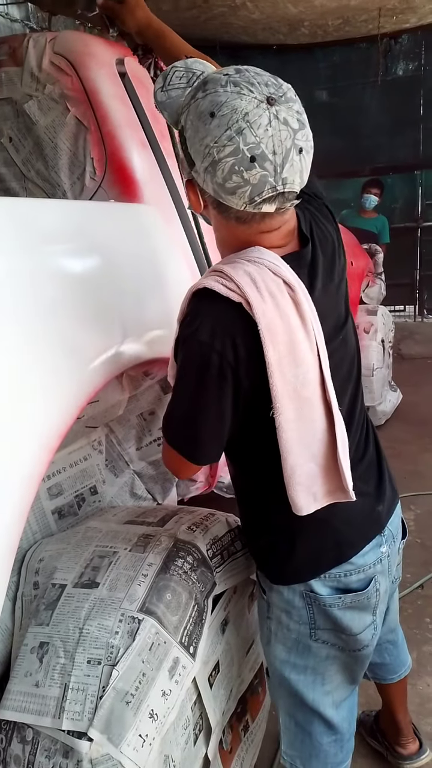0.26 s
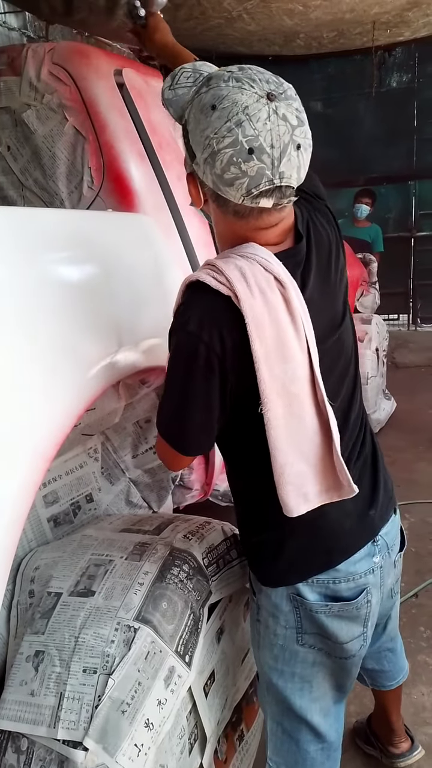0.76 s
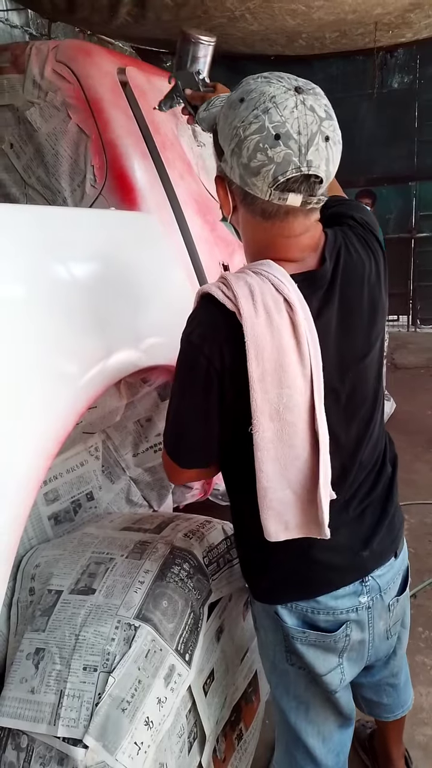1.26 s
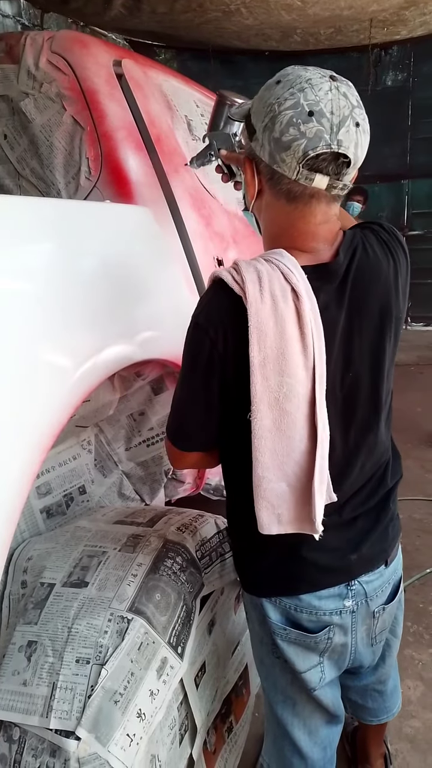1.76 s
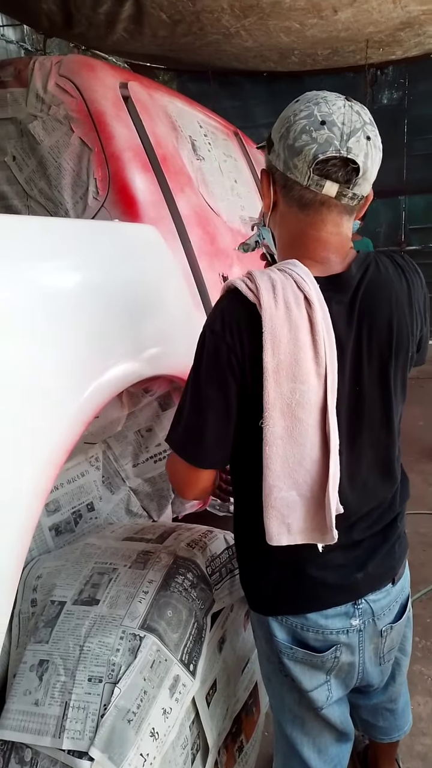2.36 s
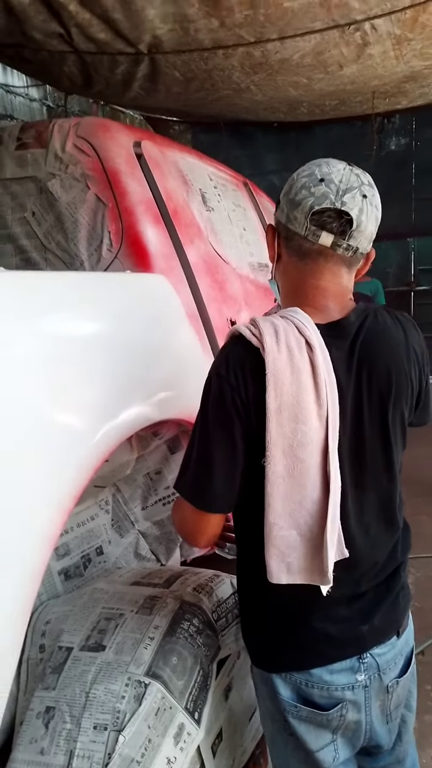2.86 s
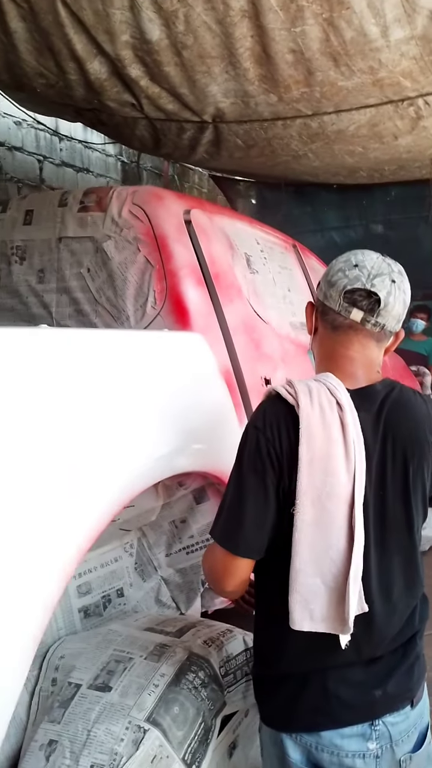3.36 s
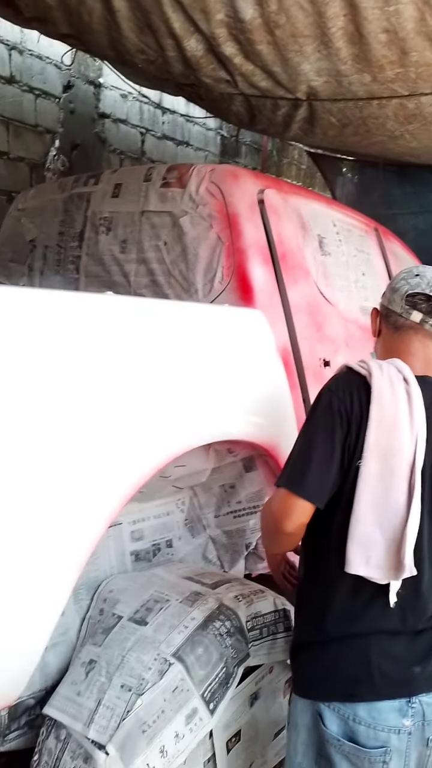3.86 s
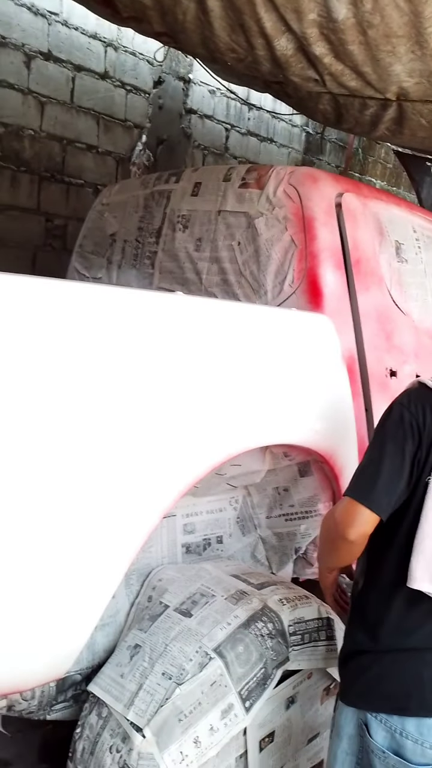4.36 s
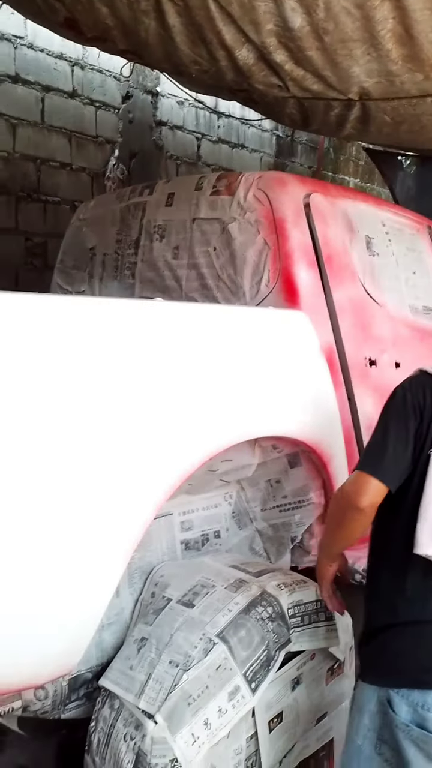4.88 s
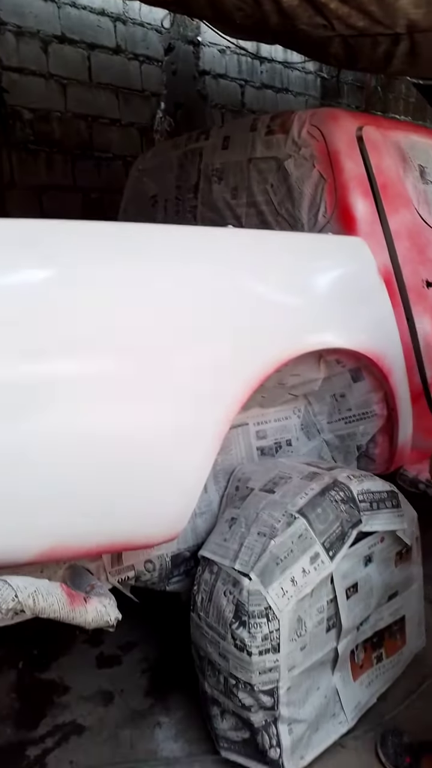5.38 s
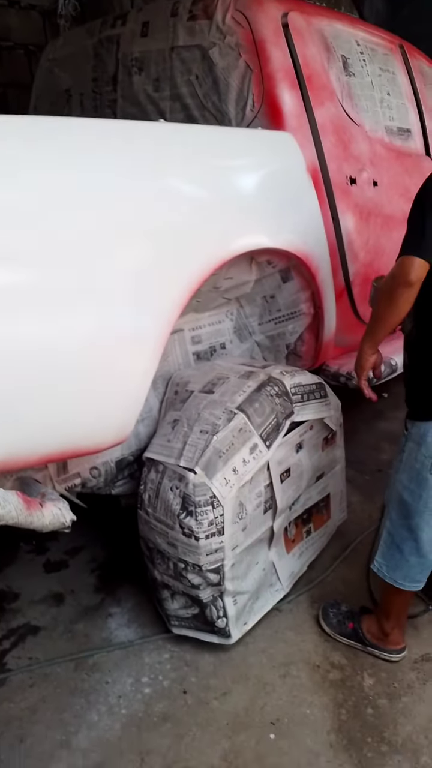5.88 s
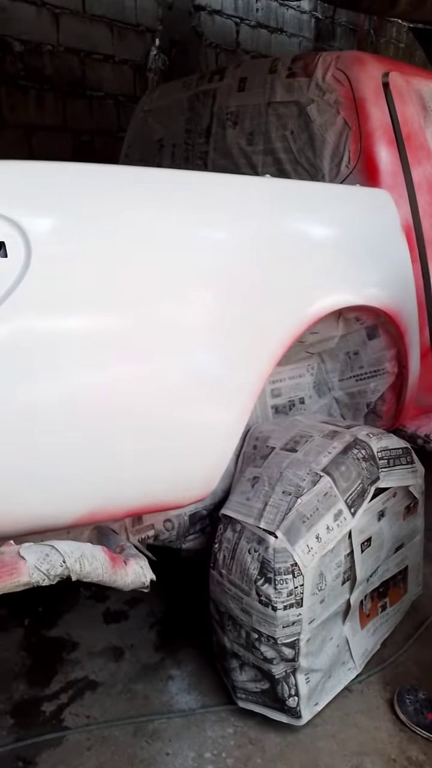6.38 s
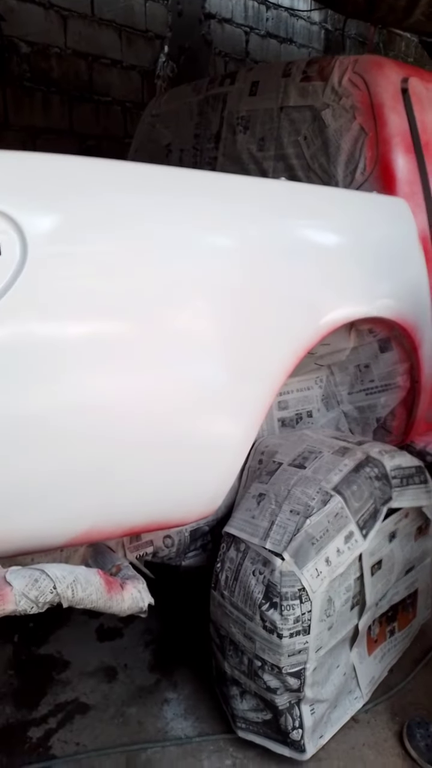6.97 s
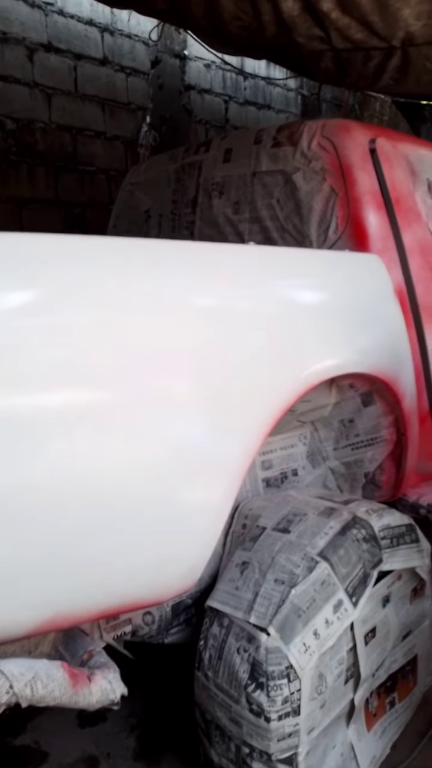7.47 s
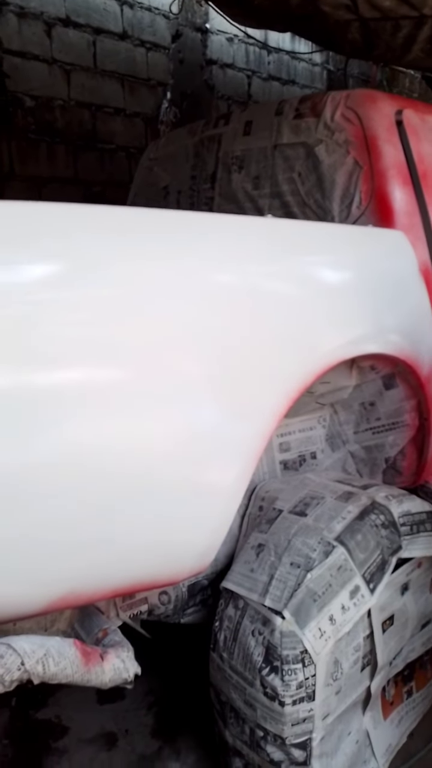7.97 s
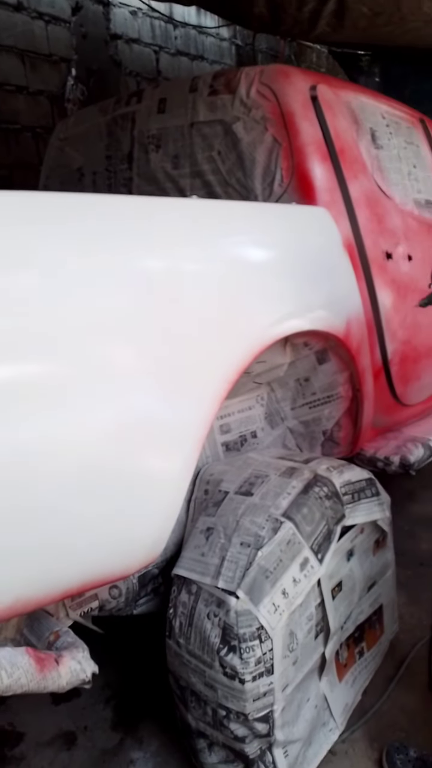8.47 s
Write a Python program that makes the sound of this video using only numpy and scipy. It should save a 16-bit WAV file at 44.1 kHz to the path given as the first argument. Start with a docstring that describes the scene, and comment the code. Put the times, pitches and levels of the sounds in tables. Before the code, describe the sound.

A piston air compressor chugs rapidly and steadily in an open paint shop, its belt squeaking, while a spray gun hisses and puffs air.

```python
"""An open paint shop, where a piston air compressor chugs ten times a second over a low drone.
Each stroke is a few gliding tones (valve and intake) plus noise that shakes the ringing cylinder head.
The belt squeaks and chirps as noisy whistles; every few seconds it slips and the strokes fall behind.
A spray gun hisses and lets out short puffs of air, all shaped noise; once, a panel is knocked.
Two small microphone ports each ring at their own treble pitch."""
import sys
import numpy as np
from scipy import signal
from scipy.fft import rfft, irfft, next_fast_len
from scipy.io import wavfile

SR = 44100
rng = np.random.default_rng(int(sys.argv[2]) if len(sys.argv) > 2 else 0)


def store_pcm(level_fs):
    """Save levels as 16-bit WAV."""
    pcm = np.round(np.clip(level_fs, -1, 1) * 32767).astype(np.int16)
    wavfile.write(sys.argv[1], SR, np.atleast_2d(pcm).T)


N = 385111   # length in samples


def from_db(db):
    """Turn a level in dB into a plain multiplier."""
    return 10 ** (np.asarray(db) / 20)


def rms_one(x):
    """Scale a sound to an average strength (rms) of 1."""
    return x / np.sqrt(np.mean(x ** 2) + 1e-20)


def in_time(rows):
    """Join a table's rows by straight lines in time, giving one curve per column."""
    s, *columns = np.transpose(rows)
    return [np.interp(np.arange(N) / SR, s, column) for column in columns]


def at_hz(points, hz):
    """Read a curve at one frequency, on a log-frequency axis."""
    points_hz, values = np.transpose(points)
    return np.interp(np.log(hz), np.log(points_hz), values)


def held(rows, column):
    """Hold each event's value until the next event."""
    rows = np.array(rows)
    latest = np.searchsorted(rows[:, 0], np.arange(N) / SR) - 1
    return rows[np.maximum(latest, 0), column]


def panned(pan_db):
    """Split a left-minus-right difference into left and right dB."""
    return np.array([pan_db, -pan_db]) / 2


def drift(rate_hz):
    """Slow random wandering with a spread of 1, made on every 40th sample and filled in."""
    r = np.exp(-80 * np.pi * rate_hz / SR)
    slow = signal.lfilter([1], [1, -2 * r, r * r], rng.standard_normal(N // 40 + 2002))[2000:]
    return np.interp(np.arange(N) / 40, np.arange(len(slow)), rms_one(slow))


def resonate(x, hz, width_hz):
    """Ring at one pitch: the same resonance twice over, with a gain of 1 at its top."""
    r = np.exp(-np.pi * width_hz / SR)
    section = [(1 - r * r) / 2, 0, (r * r - 1) / 2, 1, -2 * r * np.cos(2 * np.pi * hz / SR), r * r]
    return signal.sosfilt([section, section], x)


def bandpass(x, order, low_hz, high_hz):
    """Keep only the sound between two frequencies."""
    return signal.sosfilt(signal.butter(order, [low_hz, high_hz], "band", fs=SR, output="sos"), x)


def clicks(times, level_db):
    """Place a one-sample click at each event."""
    out = np.zeros(N)
    out[(np.asarray(times) * SR).astype(int)] = from_db(level_db)
    return out


def bursts(rows, rise, squareness=1.57):
    """Loudness curve of events that rise fast and then die away; a higher squareness holds longer."""
    out = np.zeros(N)
    for s, db, length, *_ in rows:
        span = slice(int(s * SR), min(int((s + 4 * length) * SR), N))
        u = np.arange(span.stop - span.start) / SR
        out[span] += from_db(db) * np.clip(u / rise, 0, 1) * np.exp(-(u / length) ** squareness)
    return out


FIRST_STROKE_S, STROKE_S, STROKE_COUNT = -0.0169, 0.09791, 89
SLIP_SETTLES_S = 0.0908


def stroke_times():
    """Strokes come evenly, but fall behind each time the belt slips."""
    even = FIRST_STROKE_S + STROKE_S * np.arange(STROKE_COUNT)
    late = 0
    for s, _, _, slip in CHIRPS:
        late = late + slip * (1 - np.exp(-np.clip(even - s, 0, None) / SLIP_SETTLES_S))
    return np.maximum(even + late, 0)


def stroke_swell(level_db):
    """Clicks at the strokes, and the quick swell and slower decay that follow each."""
    u = np.arange(SR // 4) / SR
    return clicks(stroke_times(), level_db), (1 - np.exp(-u / 0.0024)) * np.exp(-u / 0.052)


# brief dips in level, from a soft start; strokes and air each take a share:
# middle_s, depth_db, half_width_s
DIPS = [(0.0, -11, 0.065), (0.9, -3, 0.12), (1.66, -5.5, 0.086), (3.54, -5.5, 0.055), (5.65, -6, 0.071),
        (6.83, -8, 0.092), (8.561, -2.5, 0.038)]


def dips():
    """Loss in dB over time, bell-shaped at each dip."""
    t = np.arange(N) / SR
    return sum(db * np.exp(-((t - s) / half) ** 2) for s, db, half in DIPS)


def stroke_tones(tones, level_db, pitch_hz, wander_s):
    """Every stroke sounds the same gliding tones; their timing and strength wander a little."""
    lead = SR // 100   # room for tones that start before the stroke
    t = np.arange(SR // 6) / SR - .01
    at = (stroke_times() * SR).astype(int)
    out, strokes = np.zeros((2, N + SR)), np.zeros((2, len(at), len(t)))
    for delay, rise, fall, start, end, left_db, right_db, lag in tones:
        late, change = rng.standard_normal((len(at), 2)).T[:, :, None]
        u = t - delay - wander_s * late - np.array([0, lag])[:, None, None]
        rising = np.sin(np.pi / 2 * np.clip(u / rise, 0, 1)) ** 2.28
        falling = np.exp(-((u - rise) / fall) ** 2)
        shape = np.where(u < rise, rising, falling)
        glide = start * u + (end - start) * u ** 2 / (2 * (rise + 4.48 * fall))
        cycles = pitch_hz[at, None] * glide
        gain_db = level_db[:, None] + 1.1 * change + np.array([left_db, right_db])[:, None, None]
        strokes += from_db(gain_db) * shape * np.sin(2 * np.pi * cycles)
    for k, i in enumerate(at):
        out[:, i:i + len(t)] += strokes[:, k]
    return out[:, lead:lead + N]


# valve tones of one stroke, pitches as multiples of the valve's pitch:
# delay_s, rise_s, fall_s, start_pitch, end_pitch, left_db, right_db, right_lag_s
VALVE_TONES = [(0.00039, 0.005, 0.021, 1.01, 0.87, -0.5, -1, .00015),
               (.030, 0.01, 0.026, 0.95, 0.956, -26, -16, 0.00023),
               (.054, 0.0022, 0.022, .97, 0.93, -14.5, -17.5, .00015),
               (0.0102, 0.0079, 0.012, 1.2, 1.27, -20, -15, 0.00043)]


def valve(level_db, pitch_hz):
    """The valve sounds short gliding tones with each stroke."""
    return stroke_tones(VALVE_TONES, level_db, pitch_hz, wander_s=0.0006)


# intake tones of one stroke, pitches as multiples of the intake's pitch:
# delay_s, rise_s, fall_s, start_pitch, end_pitch, left_db, right_db, right_lag_s
INTAKE_TONES = [(-.004, 0.022, 0.012, 1.064, 0.69, 0, -3.5, 0.00005),
                (.034, 0.0085, 0.012, 1.031, 0.78, -7.5, -5.5, .00003),
                (.062, 0.02, 0.029, 1.04, 0.913, -10, -12, .00003),
                (.004, 0.0067, 0.006, 0.874, 1, -25, -25, .00003)]
INTAKE_HZ = 292.6


def intake(level_db):
    """The intake sounds lower gliding tones with each stroke."""
    return stroke_tones(INTAKE_TONES, level_db, np.full(N, INTAKE_HZ), wander_s=0.00052)


# pitches at which the cylinder head rings: pitch_hz, width_hz, left_db, right_db
HEAD_MODES = [(841.5, 56, -1.5, -11), (896.8, 57, -8, -2), (771, 27, -53, -10.5), (529, 19, -11.5, -14.5),
              (953, 21, -23, -16)]
# its higher rings: pitch_hz, width_hz, left_db, right_db
UPPER_HEAD_MODES = [(1133, 24, -4.5, -3), (1161.4, 46, 5, -15), (1274, 57, -4, -2.5), (1921, 41, -8, -12.5)]


def rattle(modes, level_db, tilt_db, repeat):
    """Strokes shake the ringing cylinder head, partly the same way every time, partly anew."""
    train, swell = stroke_swell(level_db)
    envelope = signal.oaconvolve(train, swell)[:N]
    same = signal.oaconvolve(train[None], swell * rng.standard_normal((2, len(swell))))[:, :N]
    shake = repeat * same + (1 - repeat) * envelope * rng.standard_normal((2, N))
    rings = 0
    for hz, width_hz, left_db, right_db in modes:
        gain_db = np.array([[left_db], [right_db]]) + tilt_db * np.clip((hz - 860) / 100, -1, 1)
        rings = rings + rms_one(resonate(shake, hz, width_hz)) * from_db(gain_db)
    return rings * np.sqrt(np.mean(envelope ** 2))


def drone(level_db):
    """Narrow noise makes a low drone that swells and fades, over the steady hum of the motor."""
    mid, side = rms_one(resonate(rng.standard_normal((2, N)), 430, 90))
    hum = rms_one(resonate(rng.standard_normal(N), hz=108.4, width_hz=21)) * from_db(-69)
    return from_db(level_db) * (mid + 0.18 * side * [[1], [-1]]) + hum


# squeaks of the belt, levels relative: start_s, level_db, pitch_hz, left_minus_right_db, length_s
SQUEAKS = [(0.0034, -33.5, 3830, 4, 0.12), (0.0704, -27, 3810, 1.5, 0.075), (0.199, -26, 3800, 4, 0.048),
           (0.302, -22.5, 3805, 3.5, 0.046), (0.367, -37, 3840, 7.5, 0.07), (0.475, -34, 3800, 11, 0.064),
           (0.567, -34, 3790, 8, 0.081), (0.7542, -37, 3910, 12, 0.032), (0.948, -35.5, 3900, 8.5, 0.065),
           (1.1493, -47, 3880, 8, 0.07), (1.256, -44, 3870, 11, 0.067), (1.8896, -42, 3900, 8.5, 0.079),
           (1.996, -34.5, 3860, 15, 0.07), (2.054, -31.5, 3840, 9, 0.096), (2.128, -29.5, 3840, 4.5, 0.067),
           (2.1914, -42, 3850, 8.5, 0.087), (2.28, -46, 3860, 11.5, 0.07), (2.3989, -41.5, 3870, 16, 0.098),
           (2.5617, -29.5, 3880, 12, 0.045), (2.663, -33, 3880, 9.5, 0.059),
           (2.7347, -33.5, 3820, 9.5, 0.099), (2.836, -36.5, 3860, 10, 0.07), (3.127, -45, 3830, 17, 0.097),
           (3.234, -43, 3830, 13.0, 0.047), (3.608, -41.5, 3886, 14.5, 0.081),
           (3.701, -33.5, 3870, 16, 0.042), (3.813, -46, 3840, 9, 0.07), (3.916, -38.5, 3790, 8, 0.06),
           (4.011, -43, 3760, 8, 0.07), (4.0814, -29.5, 3850, 7, 0.05), (4.245, -30, 3840, 7, 0.064),
           (4.3785, -31.5, 3895, 6, 0.06), (4.4912, -36, 3876, 5, 0.058), (4.5945, -51, 3910, 6, 0.08),
           (4.6934, -56, 3850, 11, 0.07), (4.7965, -56, 3845, 4, 0.07), (5.2325, -40, 3927, 9, 0.083),
           (5.2912, -39, 3840, 11, 0.095), (5.397, -33.5, 3860, 15, 0.045), (5.506, -49, 3920, 12, 0.064),
           (5.567, -35, 3920, 10.5, 0.067), (5.737, -44, 3966, 10, 0.07), (5.8037, -35, 3880, 14.5, 0.064),
           (5.894, -36.5, 3860, 8, 0.058), (6.172, -41, 3870, 14, 0.07), (6.2594, -51, 3890, 9, 0.055),
           (6.809, -40.5, 3820, 15, 0.12), (6.908, -36, 3840, 15, 0.07), (7.045, -39.5, 3834, 18, 0.053),
           (7.1456, -35, 3842, 21.5, 0.046), (7.25, -32.5, 3860, 12, 0.072), (7.34, -37, 3830, 8.5, 0.14),
           (7.421, -36.5, 3804, 7.5, 0.09), (7.4912, -30.5, 3780, 9, 0.11), (7.578, -29, 3783, 4.5, 0.051),
           (7.723, -32, 3810, 8, 0.19), (7.7904, -32, 3830, 4.5, 0.053), (7.8582, -32, 3850, 4.5, 0.063),
           (7.954, -32, 3840, 3.5, 0.07), (8.2292, -34, 3850, 3, 0.07), (8.558, -36.5, 3780, 7, 0.074),
           (8.66, -34, 3820, 12, 0.053)]
SQUEAK_RISE_S, SQUEAK_SQUARENESS = 0.0041, 1
SQUEAL_BED_DB = -63.5   # faint squeal between the squeaks


def squeaks():
    """The slipping belt whistles roughly: slow noise blurs a tone, 1 % lower on the right."""
    rows = [(s, db, length) for s, db, _, _, length in SQUEAKS]
    grip = bursts(rows, SQUEAK_RISE_S, SQUEAK_SQUARENESS) / 2 + from_db(SQUEAL_BED_DB)
    noise = rng.standard_normal((2, N)) + 1j * rng.standard_normal((2, N))
    slip = signal.sosfilt(signal.butter(2, 70, fs=SR, output="sos"), noise)
    # uneven grip, partly alike at both ports
    slip = (.04 + .5 * (slip[0] + slip)) * from_db(2.5 * drift(30))
    pitch_hz = held(SQUEAKS, column=2) * np.array([[1], [.99]])
    whistle = (slip * np.exp(2j * np.pi * np.cumsum(pitch_hz, axis=1) / SR)).real
    return rms_one(whistle) * grip * from_db(panned(held(SQUEAKS, column=3)))


# squeaks on the lower pitch, levels relative: start_s, level_db, length_s
LOW_SQUEAKS = [(0.107, -42, 0.098), (0.21, -37, 0.14), (0.31, -33.5, 0.055), (0.437, -34.5, 0.086),
               (0.61, -46, 0.11), (1.184, -42, 0.08), (1.3843, -42.5, 0.083), (2.087, -43, 0.098),
               (2.186, -36, 0.09), (2.315, -32.5, 0.069), (2.502, -41.5, 0.072), (2.674, -41, 0.08),
               (2.737, -45, 0.08), (2.8634, -40, 0.08), (2.988, -37, 0.046), (3.1183, -48, 0.062),
               (3.246, -57, 0.049), (3.91, -41.5, 0.15), (5.017, -37, 0.052), (5.566, -48, 0.081),
               (5.665, -36, 0.071), (5.907, -49, 0.08), (6.5075, -55, 0.08), (7.647, -38, 0.061),
               (7.722, -41, 0.093), (8.2252, -39, 0.08)]


def low_squeaks():
    """The belt also whistles on a lower pitch: narrow noise with a wandering level."""
    whistle = resonate(rng.standard_normal((2, N)), 2918, 96) * from_db(2.9 * drift(35))
    grip = bursts(LOW_SQUEAKS, SQUEAK_RISE_S, SQUEAK_SQUARENESS) / 2
    return rms_one(whistle) * grip * from_db([[4], [-5]])


# shop noise: pitch_hz, level_db (per Hz)
SHOP_AIR = [(30, -100), (62, -92), (108, -91.5), (155, -134), (260, -66), (400, -99.5), (700, -68),
            (1100, -86.5), (1700, -87.5), (2700, -86), (5000, -98), (14000, -93)]
# colour of the gun's broad hiss, relative: pitch_hz, level_db (per Hz)
GUN_AIR = [(900, -28), (2000, -70), (5000, 1.5), (9000, 9), (14000, 10.5)]
# soft puffs of air on the panel and paper: start_s, level_db, length_s, left_minus_right_db
PUFFS = [(0.25, -82, 0.18, 9), (0.42, -81, 0.1, 13), (0.75, -94.5, 0.6, 11), (1.12, -84.5, 0.17, 9),
         (2.25, -96, 0.38, 13), (2.88, -87, 0.2, 4), (3.78, -85, 0.16, 3), (4.4, -92, 0.11, -3),
         (5.36, -83.5, 0.14, 7), (8.42, -90, 0.082, 13)]
# colour of the puffs, relative: pitch_hz, level_db (per Hz)
PUFF_AIR = [(200, -82), (500, 8), (1300, 6), (1800, -2.5), (2600, 0.5), (3400, 0.5), (5000, -12.5),
            (9000, -15), (14000, -52)]
# sharp blasts of air: start_s, level_db, length_s
BLASTS = [(2.913, -85, 0.035), (3.005, -78, 0.036), (3.103, -68.5, 0.024), (5.557, -64.5, 0.063),
          (5.658, -69, 0.063), (5.7695, -74, 0.052), (6.508, -74.5, 0.043), (8.2176, -63.5, 0.063),
          (8.311, -75.5, 0.054)]
# colour of the blasts, relative: pitch_hz, level_db (per Hz)
BLAST_AIR = [(200, -32), (500, 6.5), (1300, -1), (2600, 1), (3400, -10.5), (5000, -9), (7400, -4),
             (9000, -3.5), (11000, -2), (14000, -17)]
# how alike left and right are: pitch_hz, likeness (1 = the same, 0 = unrelated)
LIKENESS = [(60, 0.88), (250, 1), (450, 0), (750, 0.86), (1300, 0.52), (2200, 0.17), (3500, 0)]
# broad noise at the left port against the right: pitch_hz, level_db
LEFT_SHADE = [(3000, -0.5), (6000, 2.5), (9000, -3), (10500, -5.5), (13000, -6), (14300, -4)]
PUFF_RISE_S, SPRAY_DB, SPRAY_PAN_DB = 0.032, -89, 5.5   # the steady spray lies under the puffs
WAKE_DB, WAKE_LENGTHS = -4.5, 1.53   # each blast leaves a duller, longer wake
RIGHT_LAG = 12   # samples between the ports


def air():
    """Shop noise, gun hiss and puffs share third-octave bands of noise; their powers add in each."""
    left_db, right_db = in_time(GUN)[:2]
    wakes = [(s, db + WAKE_DB, length * WAKE_LENGTHS) for s, db, length in BLASTS]
    spray = from_db(SPRAY_DB) + bursts(wakes, rise=0.03)
    puff = spray * from_db(panned(SPRAY_PAN_DB))[:, None]
    puff = puff + bursts(PUFFS, PUFF_RISE_S) * from_db(panned(held(PUFFS, column=3)))
    blast = bursts(BLASTS, rise=0.024) * from_db([[1.5], [-1.5]])
    # line pressure rises with each stroke
    throb_db = 2.74 * (signal.oaconvolve(*stroke_swell(0))[:N] - .4)
    gun_db = np.array([left_db, right_db]) - 56 + throb_db
    white, together = rng.standard_normal((2, 2, N)), drift(9.0)
    edges_hz = 25 * 2 ** (np.arange(29) / 3)
    out = 0
    for k, (low, high) in enumerate(zip(edges_hz, edges_hz[1:])):
        mid, side = bandpass(white[k % 2], 2, low, high)
        hz = np.sqrt(low * high)
        power = from_db(at_hz(SHOP_AIR, hz)) ** 2
        power = power + from_db(gun_db + at_hz(GUN_AIR, hz)) ** 2
        power = power + (puff * from_db(at_hz(PUFF_AIR, hz))) ** 2
        power = power + (blast * from_db(at_hz(BLAST_AIR, hz))) ** 2
        flicker = from_db(.6 * together + 1.3 * drift(9.0) + [[at_hz(LEFT_SHADE, hz)], [0]])
        alike = np.clip(at_hz(LIKENESS, hz), -1, 1)
        stereo = np.sqrt(1 + alike) * mid + np.sqrt(1 - alike) * side * [[1], [-1]]
        out = out + np.sqrt(power * SR / 4) * flicker * stereo
    out[1] = np.roll(out[1], RIGHT_LAG)
    return out + hiss_bands() * from_db(throb_db)


# spray gun hiss in the two port bands, levels relative; the flanks widen it while the gun is near:
# time_s, left_db, right_db, left_flanks_db, right_flanks_db
GUN = [(0.0, -45, -44, -47.5, -47), (0.12, -36, -43, -41.5, -43.5), (0.17, -39.5, -42.5, -48, -47),
       (0.75, -40, -38, -40.5, -45.5), (0.92, -40.5, -42.5, -52.5, -51), (1.04, -34.5, -34.5, -44, -49),
       (1.36, -42.5, -39, -41, -44), (1.68, -39, -37.5, -48, -49), (1.87, -36.5, -40, -44.5, -43),
       (2.11, -40, -40.5, -47, -43.5), (3.74, -40, -38, -56.5, -52), (4.23, -41, -41.5, -61, -68),
       (4.84, -45.5, -46.5, -61, -69), (5.35, -40, -43, -61, -59), (5.54, -46, -43.5, -55, -64),
       (5.59, -48, -45, -53, -54), (5.64, -48, -44.5, -48, -49), (6.1, -43.5, -39, -58, -61),
       (7.49, -40.5, -38.5, -66, -53.5), (7.54, -39, -38.5, -53.5, -59), (8.19, -38.5, -39.5, -50.5, -46),
       (8.24, -44, -33, -42, -44), (8.34, -46, -42, -44.5, -43), (8.73, -41, -36, -57, -54)]
# main bands of the hiss, left row then right row: low_hz, high_hz
MAIN_BANDS = [(7000, 7800), (10450, 11550)]
# flanks of the hiss, left group then right group: pitch_hz, width_hz, level_db
FLANKS = [
    [(6940, 950, -2), (8030, 640, -2.5)],
    [(10180, 1300, -1.5), (11860, 1130, 2)],
]


def hiss_bands():
    """The hiss is strongest in one treble band a side; flanks widen it while the gun is near."""
    left_db, right_db, *flank_db = in_time(GUN)
    out, white = np.zeros((2, N)), rng.standard_normal((2, 2, N))
    for side, main_db in enumerate([left_db, right_db]):
        main = bandpass(white[0, side], 3, *MAIN_BANDS[side])
        out[side] += rms_one(main) * from_db(main_db - 8.5 + 1.9 * drift(12.4))
        for hz, width_hz, db in FLANKS[side]:
            flank = rms_one(resonate(white[1, side], hz, width_hz))
            out[side] += flank * from_db(flank_db[side] + db + 1.5 + 2.3 * drift(10.3))
    # a faint whistle at the nozzle
    out[1] += rms_one(resonate(white[1, 0], 11030, 80)) * from_db(-52.5)
    return out


# belt joint on the pulley, where the belt slips and the strokes fall behind:
# start_s, level_db (relative), length_s, slip_s
CHIRPS = [(2.209, -39.5, 0.14, 0.018), (4.8727, -42, 0.044, 0.013), (7.542, -39.5, 0.077, 0.019)]
# pitches in each chirp: pitch_hz, width_hz, level_db
CHIRP_MODES = [(2380, 170, 4), (4580, 780, -1.5), (2730, 91, -14)]


def belt_chirps():
    """The belt's joint chirps as it meets the pulley: noise heard through a few resonances."""
    scrape, noise, out = bursts(CHIRPS, rise=0.0051), rng.standard_normal((2, N)), 0
    for hz, width_hz, db in CHIRP_MODES:
        ring = rms_one(resonate(noise, hz, width_hz))
        out = out + scrape * ring * from_db(db + np.array([[-3], [-10]]))
    return out


# a knock on a panel: start_s, level_db (relative)
THUD = [(8.233, -29)]
# pitches at which the panel rings: pitch_hz, level_db, time_to_fall_60_db_s
PANEL = [(530.4, 2.5, 0.33), (1050, -17, 0.089), (1360, 0, 0.13)]


def thud():
    """A soft blow sets the panel ringing at its own pitches, which die away."""
    u = np.arange(SR // 2) / SR
    ring = sum(from_db(db - 60 * u / t60) * np.sin(2 * np.pi * hz * u) for hz, db, t60 in PANEL)
    ring = ring * (1 - np.exp(-u / 0.0033))   # soft start
    return signal.oaconvolve(clicks(*np.transpose(THUD)), ring)[:N] * from_db([[1.5], [-1.5]])


SHOP_T60_S, SHOP_DB = 0.084, -15   # time for the echoes to fall 60 dB, and their gain


def shop(x):
    """The room echoes: eight repeating delays a side, worked out frequency by frequency."""
    size = next_fast_len(N + SR)
    w = 2 * np.pi * np.arange(size // 2 + 1) / size
    lags = rng.uniform(0.02, .055, (2, 8)) * SR
    echo = np.zeros((2, len(w)), complex)
    for side in range(2):
        for lag in lags[side]:
            once = from_db(-60 * lag / SR / SHOP_T60_S) * np.exp(-1j * w * lag)
            echo[side] += once / (1 - once)   # the sum of all repeats
    return irfft(rfft(x, size) * echo, size)[:, :N]


# the compressor's colour changes as the listener turns: time_s, valve_db, intake_db, rattle_db,
# valve_hz, rattle_tilt_db (per 100 Hz), upper_rattle_db, drone_db
SHADE = [(0.0, -25, -33, -34.5, 638, 2, -43, -68), (0.5, -27, -30, -34, 623, -2, -44, -60.5),
         (1.4, -26.5, -30.5, -33, 632, 1.5, -40.5, -65), (1.9, -27.5, -31, -34.5, 624, 1.5, -46, -69),
         (3.35, -28.5, -31, -33, 628, 1.5, -45.5, -62), (3.5, -28.5, -31.5, -36, 631, 1, -54, -74),
         (3.9, -27, -33.5, -33, 633, 3.5, -63, -52), (5.0, -25.5, -34.5, -34, 647, 9, -70, -90),
         (5.7, -25.5, -31, -34, 637, 1, -52, -47), (6.1, -28.5, -32, -31.5, 629, -0.5, -49, -55),
         (7.15, -24.5, -32.5, -34, 622, -5, -50.5, -51.5), (7.45, -28, -32.5, -32, 627, 2.5, -67, -82),
         (8.2, -25, -32.5, -33.5, 636.8, -3, -46, -48.5), (8.73, -27, -30, -31.5, 619, -2.5, -54, -53)]
STROKE_SCATTER_DB = 1.0
INTAKE_DIPS, RATTLE_DIPS, HISS_DIPS = 0.66, 0.78, 0.1   # share of each dip in each layer


def scene():
    """Valve, intake and knock ring in the shop; the other layers join without added echo."""
    valve_db, intake_db, rattle_db, valve_hz, tilt_db, upper_db, drone_db = in_time(SHADE)
    at, dip_db = (stroke_times() * SR).astype(int), dips()
    scatter_db = STROKE_SCATTER_DB * rng.standard_normal((3, len(at)))
    near = valve(valve_db[at] + scatter_db[0], valve_hz) * from_db(dip_db)
    near = near + intake(intake_db[at] + scatter_db[1]) * from_db(INTAKE_DIPS * dip_db)
    near = near + thud()
    head = rattle(HEAD_MODES, rattle_db[at] + scatter_db[2], tilt_db, repeat=0.55)
    head = head + from_db(upper_db) * rattle(UPPER_HEAD_MODES, 0, 0, repeat=0.72)
    compressor = near + from_db(SHOP_DB) * shop(near) + head * from_db(RATTLE_DIPS * dip_db)
    belt = squeaks() + low_squeaks() + belt_chirps()
    return compressor + drone(drone_db) + belt + air() * from_db(HISS_DIPS * dip_db)


# microphone ports, left row then right row: pitch_hz, spread_hz, width_hz, lift_db (in each of 3 stages)
PORTS = [(7395, 195, 743, 5.5), (10760, 410, 1090, 5.5)]
CUTOFF_HZ = 14270


def record(dry):
    """Each port lifts its own treble band with three neighbouring resonances; the top is cut."""
    ported = dry.copy()
    for side, (hz, spread_hz, width_hz, db) in enumerate(PORTS):
        damping = np.pi * width_hz / SR
        lifted = damping * from_db(db)
        stages = []
        for stage_hz in hz + spread_hz * np.array([-1, 0, 1]):
            c = np.cos(2 * np.pi * stage_hz / SR)
            stage = np.array([1 + lifted, -2 * c, 1 - lifted, 1 + damping, -2 * c, 1 - damping])
            stages.append(stage / (1 + damping))
        ported[side] = signal.sosfilt(stages, dry[side])
    return signal.sosfilt(signal.ellip(12, .5, 60, CUTOFF_HZ, fs=SR, output="sos"), ported)


dry = scene()
out = record(dry)
store_pcm(out)
```